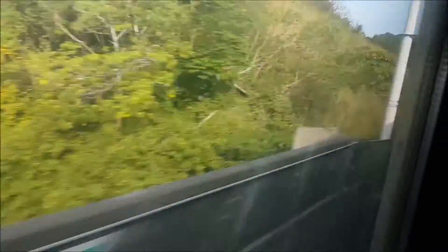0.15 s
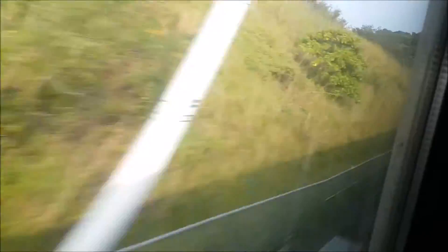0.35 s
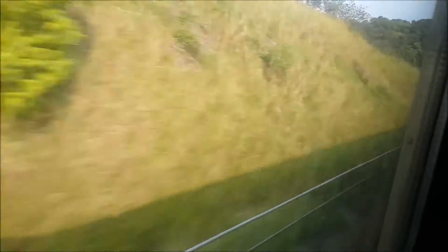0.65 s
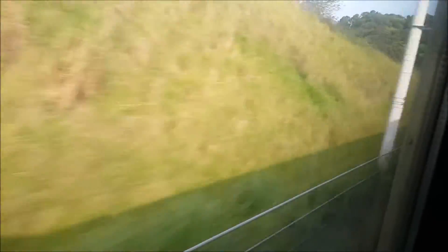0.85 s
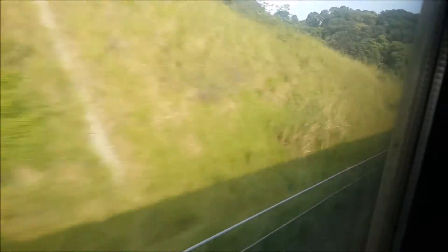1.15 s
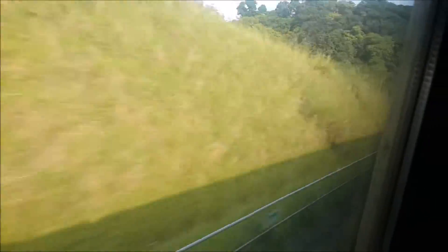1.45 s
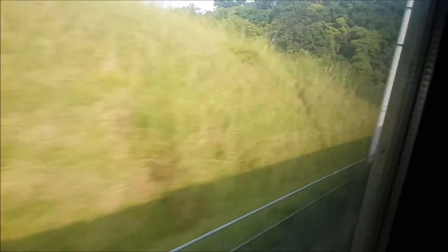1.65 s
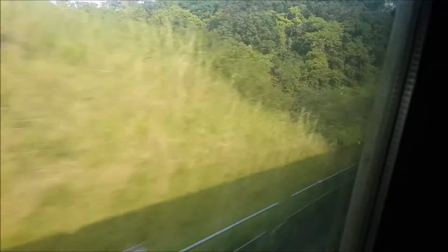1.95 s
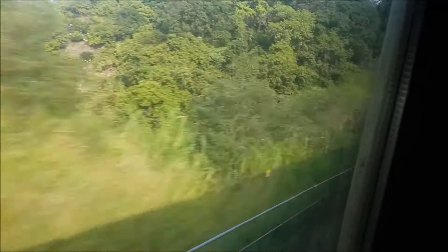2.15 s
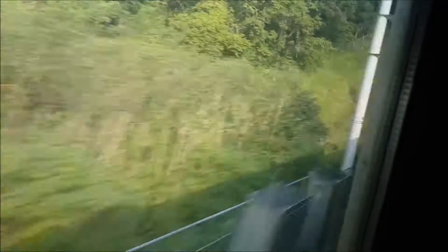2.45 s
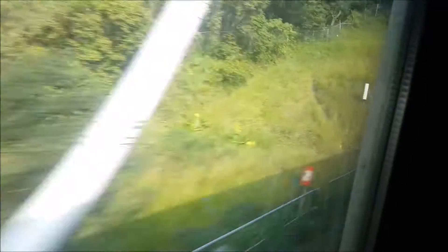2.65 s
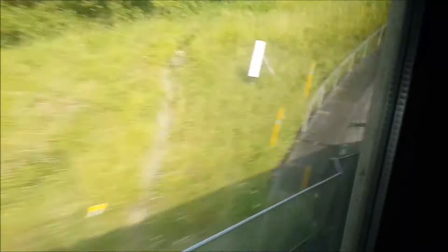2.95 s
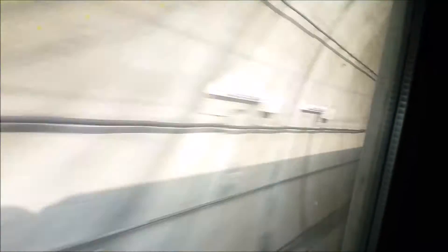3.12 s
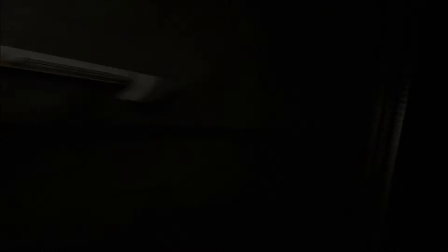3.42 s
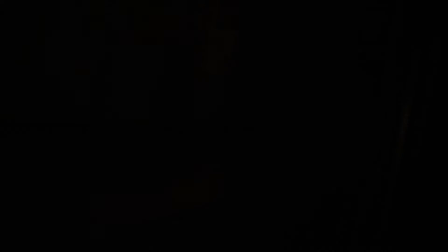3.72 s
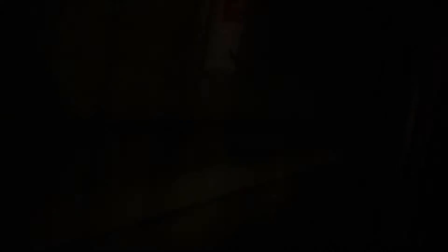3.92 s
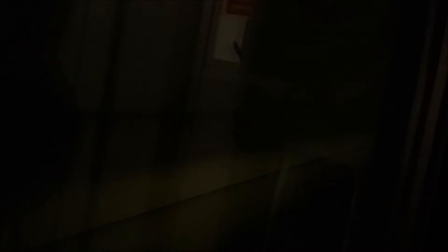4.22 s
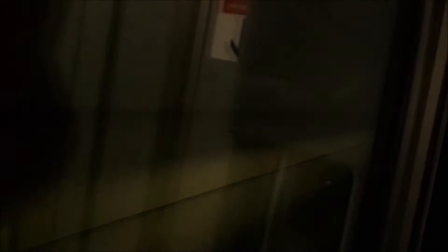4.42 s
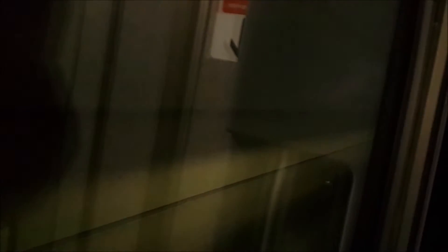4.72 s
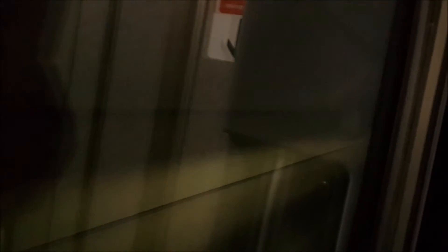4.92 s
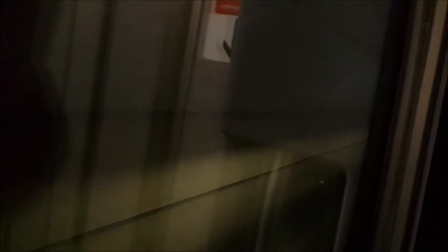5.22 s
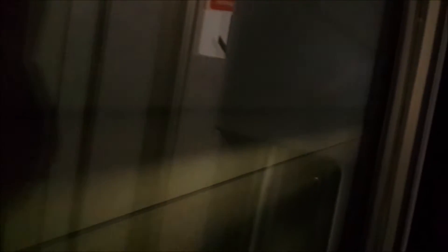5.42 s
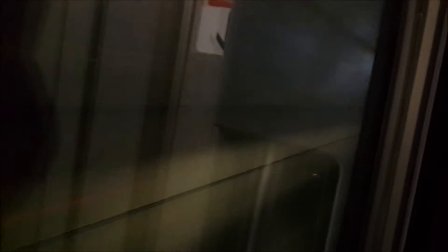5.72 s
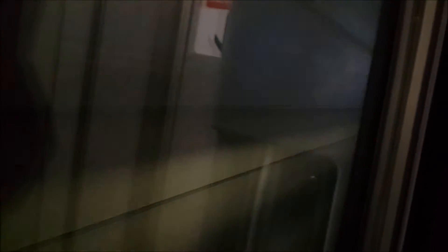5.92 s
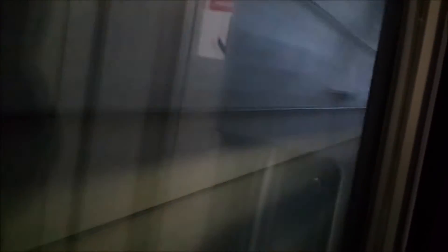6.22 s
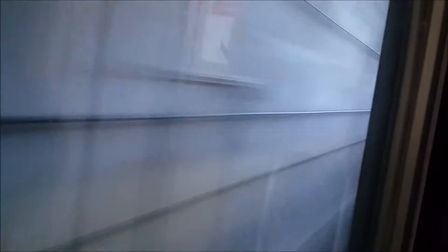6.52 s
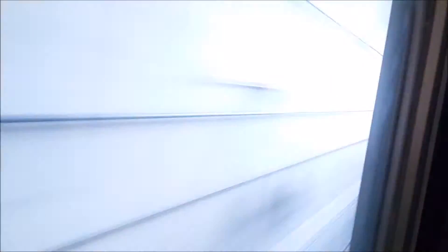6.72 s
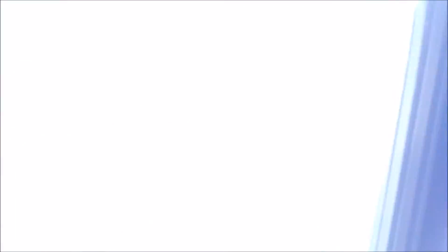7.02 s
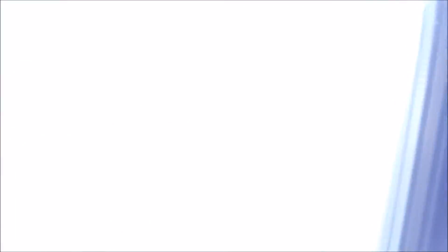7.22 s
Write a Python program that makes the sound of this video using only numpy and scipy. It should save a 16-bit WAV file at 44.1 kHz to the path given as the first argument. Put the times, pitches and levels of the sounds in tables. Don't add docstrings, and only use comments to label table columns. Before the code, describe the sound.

A continuous train ride from the vestibule: dense bassy rumble, mid rolling noise and quiet hiss from the door seals. A faint high whine stays almost fixed in pitch while wheel rims whistle briefly. Tunnel walls subtly thicken the roar and dull the top from about three seconds. One small tick comes past five seconds, then a sharper cluster about a second later. Close small stereo microphone, narrow bass and slightly mottled treble.

```python
import sys
import numpy as np
from scipy import signal
from scipy.fft import rfft, irfft
from scipy.io import wavfile
from scipy.ndimage import uniform_filter1d, minimum_filter1d

SR = 44100
rng = np.random.default_rng(int(sys.argv[2]) if len(sys.argv) > 2 else 0)


def invert_db(x):
    u = np.asarray(x, float) / 20
    return 10 ** u


def materialize(psi):
    bounded = np.clip(np.atleast_2d(psi).T, -1, 1)
    quanta = np.round(bounded * 32767).astype(np.int16)
    wavfile.write(sys.argv[1], SR, quanta)


N = 324576


def evened(x):
    return x / np.sqrt(np.mean(abs(x) ** 2) + 1e-20)


def steadied(x, size):
    power = uniform_filter1d(np.mean(abs(np.atleast_2d(x)) ** 2, axis=0), size)
    return x / np.sqrt(power + 1e-9)


def read(points, hz):
    f, value = np.transpose(points)
    return np.interp(np.log(hz + 1), np.log(f + 1), value)


def curve(table):
    s, value = np.transpose(table)
    return np.interp(np.arange(N) / SR, s, value)


def add(mix, s, sound):
    part = mix[max(round(s * SR), 0):][:len(sound)]
    part += sound[:len(part)]


def swells(table):
    out = np.zeros(N)
    for s, db, length_s in table:
        add(out, s - length_s, db * np.hanning(round(2 * length_s * SR)))
    return out


def drift(width_hz, count):
    step = 16
    shape = (count, N // step + 2)
    z = rng.standard_normal(shape) + 1j * rng.standard_normal(shape)
    r = np.exp(-np.pi * max(width_hz, .2) * step / SR)
    for _ in range(2):
        z = signal.lfilter([1 - r], [1, -r], z)
    return [np.interp(np.arange(N) / step, np.arange(len(row)), row) for row in evened(z)]


# f/Hz, likeness [0-1]
LIKENESS = [(60, 0.98), (200, .99), (350, 0.9), (640, 0.82), (1000, 0.51), (1400, .03), (3000, 0.027)]
# f/Hz, level/dB
LEAN = [(60, -1.5), (130, 0.5), (290, 0.5), (640, 3), (1390, 5.5), (3060, 1), (6730, 0.5), (14800, 4.5)]
# f/Hz, share
AIRY = [(3000, -0.46), (4500, 0.088), (6000, 0.34), (8000, 0.27), (10500, 0.91)]


def noise(spectrum, level_db, patchy_db, flicker_db, size=512, modes=(), top_db=0):
    frames, hz = N // size + 5, np.fft.rfftfreq(4 * size, 1 / SR)
    a, b, c, d, patches = rng.standard_normal((frames, len(hz), 5)).T
    patches = uniform_filter1d(patches, size=20, axis=0)
    patches = evened(uniform_filter1d(patches, size=8, axis=1))

    same = np.clip(read(LIKENESS, hz), -1, 1)[:, None]
    left = a + 1j * b
    right = same * left + np.sqrt(1 - same ** 2) * (c + 1j * d)

    shape_db = read(spectrum, hz)
    for f, width_hz, db in modes:
        shape_db = shape_db + db / (1 + (2 * (hz - f) / width_hz) ** 2)
    lean_db = read(LEAN, hz) / 2
    top = np.resize((top_db * np.ones(N))[::size], frames) * read(AIRY, hz)[:, None]
    z = np.array([left, right]) * invert_db(shape_db + np.array([lean_db, -lean_db]))[:, :, None]
    z *= invert_db(patchy_db * patches + top)

    x = signal.istft(z, nperseg=4 * size, noverlap=3 * size)[1][:, :N]
    x = steadied(x, size=3000)
    x = x / np.sqrt(np.mean(x.mean(0) ** 2))
    flicker = np.sqrt(2) * drift(5.9, count=1)[0].real
    return x * invert_db(level_db + flicker_db * flicker)


def tone(hz, level_db, side_db, smear_hz, fuzz):
    mid, side = drift(smear_hz, count=2)
    mid = (1 - fuzz) * mid / abs(mid) + fuzz * mid
    mid = steadied(mid, size=5000)
    side = side * invert_db(side_db)
    phase = 2 * np.pi * np.cumsum(hz * np.ones(N)) / SR
    carrier = np.sqrt(2) * invert_db(level_db) * np.exp(1j * phase)
    return np.array([(carrier * (mid + side)).real, (carrier * (mid - side)).real])


def walls():
    tunnel_s, portal_s = 3.35, .4
    return .5 + .5 * np.tanh(2 * (np.arange(N) / SR - tunnel_s) / portal_s)


# t/s, level/dB
SURFACE = [(0, -30), (.2, -31.5), (.52, -31), (.97, -33), (1.45, -30.5), (1.8, -29.5), (2.38, -29.5),
           (2.55, -30.5), (3.05, -29.5), (3.3, -30), (4.3, -31.5), (4.62, -28.5), (5.3, -32.5), (5.82, -29),
           (6.0, -31), (6.3, -29), (6.9, -29.5), (7.36, -33.5)]
# t/s, level/dB, length/s
JOINTS = [(.06, 2, .06), (.6, -0.5, 0.056), (1.62, -1, 0.066), (2.8, 1, 0.083), (3.47, 2, 0.068),
          (4.74, 0.5, .08), (4.95, -0.5, .08), (6.22, 3.5, 0.12), (6.39, 4.5, 0.027), (6.48, 3.5, 0.016),
          (6.62, 3, .06), (6.93, 0.5, 0.043)]


def rail():
    rest_db = -30
    return curve(SURFACE) - rest_db + swells(JOINTS)


# f/Hz, level/dB per Hz
BOOM = [(15, -74), (30, -37.5), (45, -31), (58, -20), (95, -13.5), (130, -12), (190, -11), (230, -14.5),
        (265, -21), (350, -23.5), (400, -25), (430, -41), (500, -37.5), (700, -79)]
# f/Hz, width/Hz, level/dB
CABIN = [(71, 18, 8), (115, 14, 2), (210, 15, 5), (243, 16, 4), (281, 12, 7), (322, 20, 3), (388, 25, 2)]


def body_boom():
    level_db = -15.5 + 0.33 * rail()
    return noise(BOOM, level_db, patchy_db=-0.14, flicker_db=-0.33, size=2048, modes=CABIN)


# f/Hz, level/dB per Hz
FLOOR = [(90, -36.5), (125, -14.5), (150, -2), (162, -4.5), (175, 0.5), (192, -10.5), (240, -72)]
# t/s, level/dB, length/s
LURCHES = [(.15, 3.5, 0.077), (.49, -5.5, 0.13), (.85, -3, .06), (1.42, 4.5, .2), (2.11, -1.5, .08),
           (2.55, 1, .15), (2.75, -5, 0.073), (2.89, 6.5, 0.088), (3.0, -15.5, 0.066), (3.19, -3, 0.061),
           (3.33, 6, .12), (3.73, 4, 0.12), (3.98, -3, 0.12), (4.27, 7, 0.034), (4.68, -3, .1),
           (4.82, 6.5, 0.069), (5.05, 2, 0.1), (5.52, -6, .14), (5.7, -7.5, .06), (5.81, 1.5, 0.2),
           (6.18, -2.5, .05), (6.26, 3, .08), (6.58, -4, 0.035), (6.91, -9, .04), (7.0, -3.5, 0.033),
           (7.2, 3.5, 0.061)]


def floor_boom():
    return noise(FLOOR, -14.5 + swells(LURCHES), patchy_db=1.1, flicker_db=0.36, size=2048)


# f/Hz, level/dB per Hz
ROAR = [(220, -34), (380, -3), (433, -4), (669, -5), (1060, -11.5), (1150, -13.5), (1640, -14.5),
        (1800, -25), (2340, -21), (3960, -120)]


def wheel_roar():
    level_db = -28 + 0.78 * rail() + 1 * walls()
    return noise(ROAR, level_db, patchy_db=0.6, flicker_db=-0.6)


# f/Hz, level/dB per Hz
RING = [(1400, -56), (1750, -0.5), (1950, 1.5), (2300, 2), (2650, 3), (2850, -6), (3100, -11), (3600, -72)]


def wheel_ring():
    level_db = -34.5 + 0.81 * rail() + 1.45 * walls()
    return noise(RING, level_db, patchy_db=-0.5, flicker_db=1.4)


# f/Hz, level/dB per Hz
HISS = [(1700, -29), (2900, 3.5), (3470, -1), (4550, -2), (5120, 0.5), (5570, -2.5), (6760, -2.5),
        (7600, -6.5), (8500, -14), (10300, -20), (11000, -23.5), (13000, -33), (15300, -42), (15600, -70)]


def air_hiss():
    walled = walls()
    level_db = -38 + 1 * rail() + 0.7 * walled
    open_top_db, walled_top_db = 4.5, 0
    top_db = open_top_db + (walled_top_db - open_top_db) * walled
    return noise(HISS, level_db, patchy_db=0.85, flicker_db=.5, top_db=top_db)


# t/s, f/Hz
SPEED = [(0, 157.8), (2.2, 158.3), (3.8, 158.6), (5.2, 158.9), (6.2, 159.4), (7.36, 159.9)]
# t/s, level/dB
PULL = [(0, -38), (.16, -44), (.42, -34), (.95, -40.5), (1.22, -36.5), (1.62, -37), (2.12, -33),
        (2.48, -41.5), (2.62, -35), (3.05, -33.5), (3.2, -39), (3.85, -35.5), (3.99, -50), (4.1, -35.5),
        (4.67, -36), (5.25, -41), (6.95, -41), (7.22, -36)]
ORDER = [
    (12, 0.5, 0.42, 0.5, 8.6),
    (13, -56, 0.75, 10, 5.4),
    (14, -48.5, 0.8, -1.5, 11),
    (15, -47.5, 0.56, -6, 16),
    (16, -43, 1.2, -5, 6.8),
]
# t/s, level/dB, length/s, order
WHINES = [(1.05, 13, .3, 13), (1.75, 4, .3, 13), (2.6, 13, .2, 13), (4.85, 10, .2, 13), (5.8, 7, .5, 13),
          (6.9, 13.5, 1, 13), (1.7, 8, 0.48, 14), (2.2, 11, 0.49, 14), (3.05, 9, 0.49, 14),
          (3.8, 8, .25, 14), (4.55, 10, 0.29, 14), (5.85, 7, .2, 14), (6.202, 2, .2, 14), (6.85, 4, .3, 14),
          (.5, 10, 0.68, 15), (1.95, 10, 0.3, 15), (3.202, 9, 0.27, 15), (4.55, 6.5, .35, 15),
          (5.75, 11.5, .25, 15), (6.15, 7, .25, 15), (6.9, 8, .5, 15)]


def motor():
    rate_hz, track_db = curve(SPEED), rail()
    pull_fade_db, pull_fade_hz = 3.5, 14
    fade_db, fade_hz = 3, 8
    drive = [curve(PULL) + pull_fade_db * drift(pull_fade_hz, count=1)[0].real]
    for fade in drift(fade_hz, count=len(ORDER))[1:]:
        drive.append(fade_db * np.sqrt(2) * fade.real)

    out = np.zeros((2, N))
    for own_db, (order, db, share, side_db, smear_hz) in zip(drive, ORDER):
        order = round(order)
        opened_db = swells(row[:-1] for row in WHINES if round(row[-1]) == order)
        level_db = own_db + db + share * track_db + opened_db
        out += tone(order * rate_hz, level_db, side_db, smear_hz, fuzz=.8)
    return out


# t/s, level/dB, length/s
SINGS = [(.37, 9, 0.14), (.72, 11.5, 0.11), (1.37, 6, .07), (1.68, 7, .12), (2.2, 4.5, 0.15),
         (2.43, 7, .12), (2.87, 10, 0.078), (3.08, 4, .06), (3.65, 8, .06), (3.94, 5, 0.052), (4.3, 6, .08),
         (4.6, 7.5, 0.28), (4.92, 6, .07), (5.56, 5, 0.14), (6.42, 4.5, 0.11), (6.76, 10.5, .1),
         (6.9, 5.5, .07)]
# t/s, level/dB, length/s
OCTAVE_SQUEALS = [(1.7, 12, .1), (1.87, 15, 0.18), (2.12, 17, 0.075), (2.31, 15.5, .15), (3.0, 10, .15),
                  (3.47, 8, .08), (4.4, 7, 0.55), (5.85, 4, .15), (6.22, 12, .08), (6.31, 14, .04),
                  (6.42, 17.5, 0.12)]
# t/s, level/dB, length/s
THIRD_SQUEALS = [(1.57, 10, .12), (1.85, 11.5, .12), (2.15, 11, .12), (2.35, 8, .12), (2.85, 22, 0.13),
                 (3.02, 17.5, 0.15), (4.1, 10, 0.28), (4.67, 17.5, .18), (6.44, 18, .07), (6.63, 23, 0.18)]
# f/Hz, width/Hz, level/dB, slope/dB per s, share of third-multiple level
RIM_TOP = [
    (7678, 26, -3, 0, 1),
    (10230, 220, -45, -1.3, .3),
    (12790, 90, -56, -1, .3),
]


def wheel_rims():
    t, wander = np.arange(N) / SR, np.sqrt(2) * drift(9, count=1)[0]
    rim_hz = 2567 + 6 * wander.real
    rim_db = -40.5 + .9 * rail() + swells(SINGS)
    out = tone(rim_hz, rim_db, side_db=-1.5, smear_hz=14, fuzz=.4)

    octave_hz = 5045 + 25 * wander.imag
    octave_db = -55 + swells(OCTAVE_SQUEALS)
    out += tone(octave_hz, octave_db, side_db=-1.2, smear_hz=60, fuzz=.95)

    third_db = -61 + swells(THIRD_SQUEALS)
    for hz, width_hz, db, slope, share in RIM_TOP:
        level_db = share * third_db + db + slope * t
        out += tone(hz, level_db, side_db=-1.5, smear_hz=width_hz, fuzz=0.73)
    return out


# t/s, crack level/dB, t60/s, left minus right/dB, rattle level/dB
TICKS = [
    (5.4368, -24, .005, 5, -18),
    (6.435, -34, .03, 5, -20),
    (6.4752, -16, .005, 5, -6),
    (6.4885, -28, .012, 5, -12),
    (6.503, -33, .02, 5, -20),
]
# f/Hz, level/dB per Hz
CRACK = [(3000, -30), (5000, -6), (6000, 0), (8000, -2), (10000, -9), (12000, -11), (14000, -7),
         (16000, -12)]
# f/Hz, level/dB per Hz
RATTLE = [(3500, -36), (5000, 2), (6500, 1), (8000, -2.5), (9500, -20), (14000, -22), (16000, -34)]


def shaped_burst(spectrum, size):
    hz = np.fft.rfftfreq(size, 1 / SR)
    return evened(irfft(rfft(rng.standard_normal((2, size))) * invert_db(read(spectrum, hz))))


def ticks():
    size = 2048
    out, t = np.zeros((2, N)), np.arange(size) / SR
    rattle_t60_s, attack_s = 0.077, 0.00033
    for s, db, t60_s, pan_db, rattle_db in TICKS:
        burst = shaped_burst(CRACK, size) * invert_db(-60 * t / t60_s)
        burst += shaped_burst(RATTLE, size) * invert_db(rattle_db - 60 * t / rattle_t60_s)
        burst *= np.minimum(t / attack_s, 1)
        at = round(s * SR)
        out[:, at:at + size] += burst * invert_db(db + np.array([[pan_db / 2], [-pan_db / 2]]))
    return out


def scene():
    train = body_boom() + floor_boom() + wheel_roar() + wheel_ring() + air_hiss()
    return train + motor() + wheel_rims() + ticks()


def roll_off(x):
    return signal.sosfilt(signal.butter(12, 15370, fs=SR, output="sos"), x)


# f/Hz, reach [0-1]
TOP = [(8000, 0), (10500, 1)]


def record(dry):
    level_db = 20 * np.log10(abs(dry).max(0) + 1e-6)
    fall_db = np.arange(N) * 60. / SR
    peak_db = np.maximum.accumulate(level_db + fall_db) - fall_db
    over_db = np.maximum(peak_db + 5.5, 0)
    window = np.hanning(400) / np.hanning(400).sum()
    held = dry * invert_db(1.63 - 0.38 * signal.oaconvolve(over_db, window, "same"))

    ceiling = np.minimum(.93 / (abs(held).max(0) + 1e-6), 1)
    ceiling = minimum_filter1d(ceiling, size=601)
    held = held * uniform_filter1d(uniform_filter1d(ceiling, size=301), size=301)

    hz, _, z = signal.stft(held, SR, nperseg=1024)
    power = uniform_filter1d(abs(z) ** 2, size=5, axis=2)
    around = uniform_filter1d(power, size=15, axis=1)
    above_db = 10 * np.log10(power / (around + 1e-20) + 1e-9)
    cut_db = read(TOP, hz)[:, None] * 2.5 * np.clip(above_db - .5, -10, 0)
    edge_hz = 15450
    z = z * (hz < edge_hz)[:, None] * invert_db(cut_db)
    mix = signal.istft(z, SR, nperseg=1024)[1][:, :N]
    return roll_off(mix)


dry = scene()
out = record(dry)
materialize(out)
```